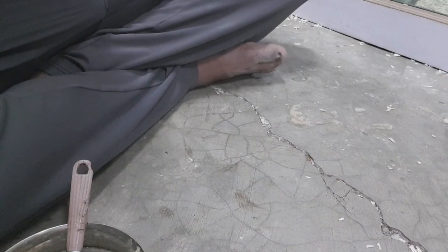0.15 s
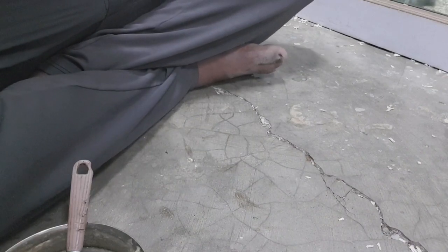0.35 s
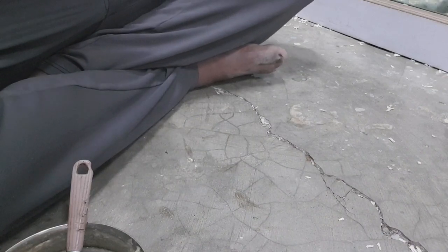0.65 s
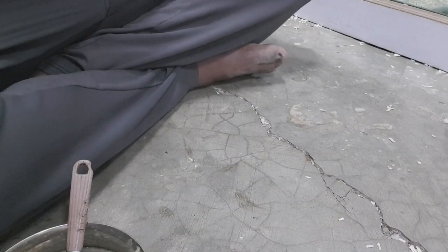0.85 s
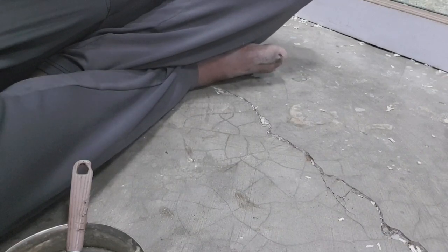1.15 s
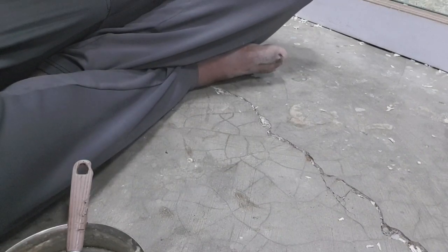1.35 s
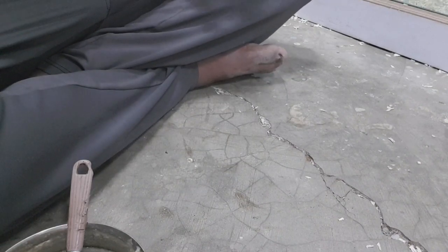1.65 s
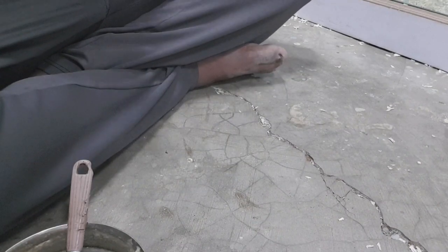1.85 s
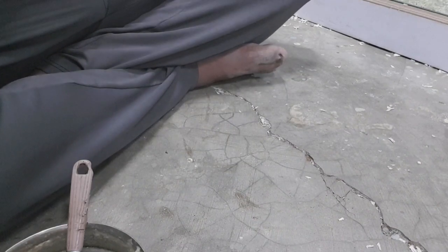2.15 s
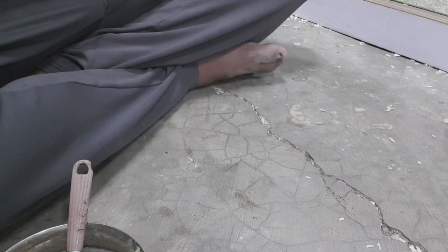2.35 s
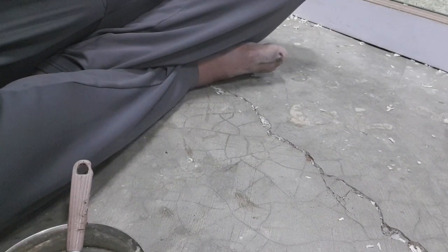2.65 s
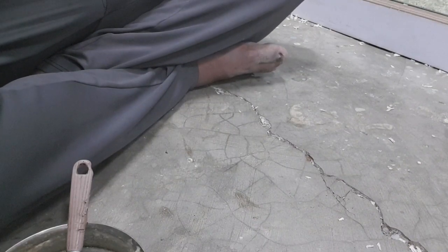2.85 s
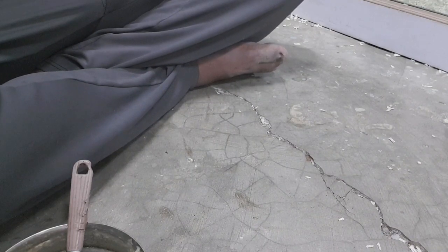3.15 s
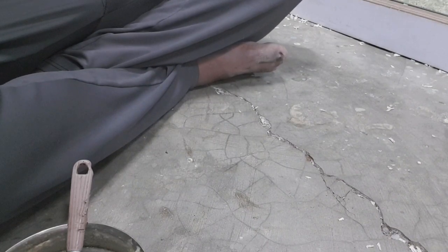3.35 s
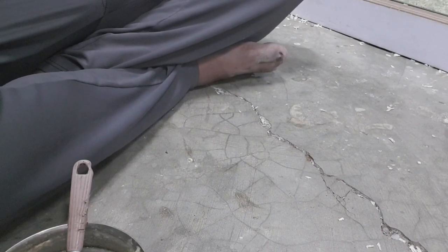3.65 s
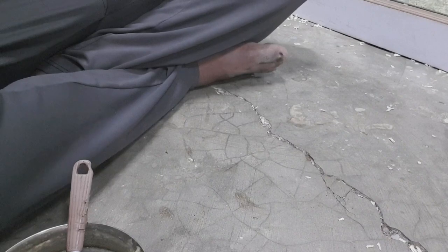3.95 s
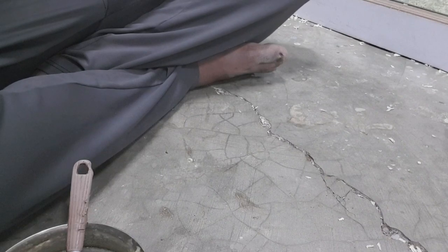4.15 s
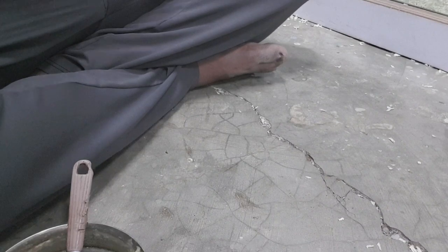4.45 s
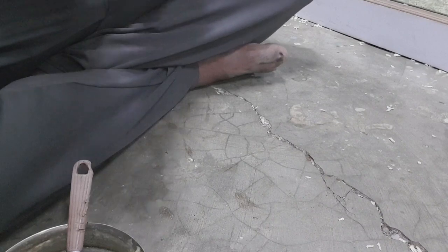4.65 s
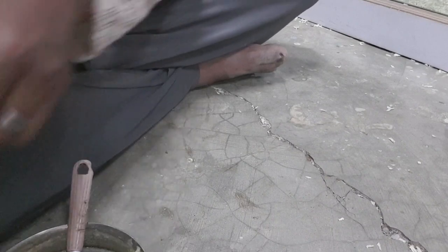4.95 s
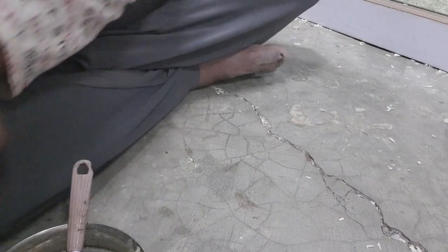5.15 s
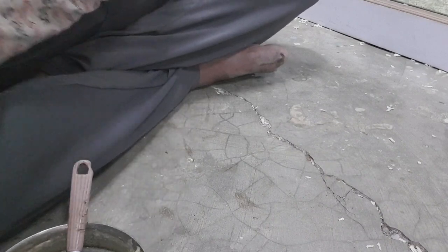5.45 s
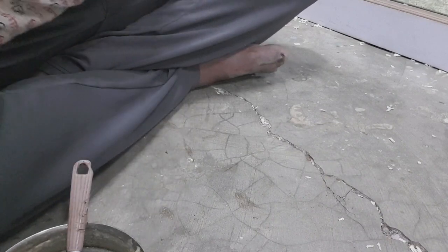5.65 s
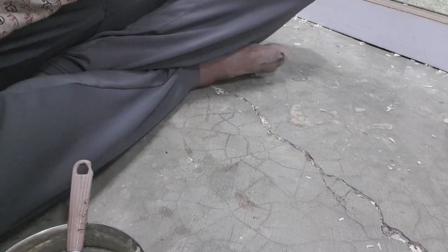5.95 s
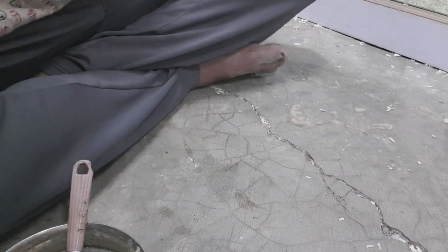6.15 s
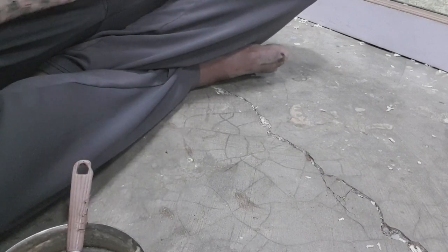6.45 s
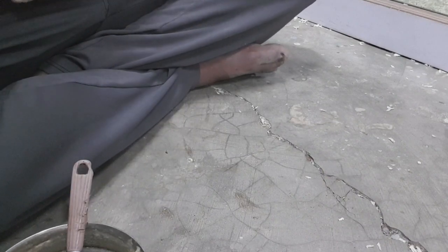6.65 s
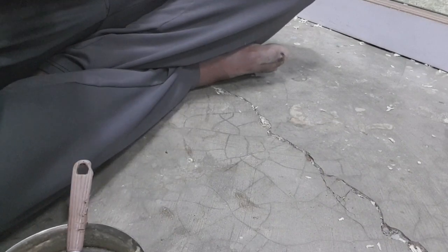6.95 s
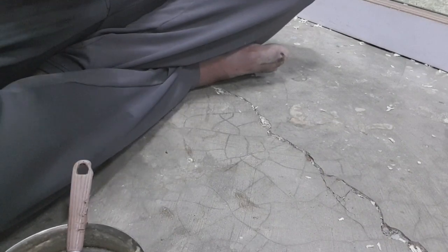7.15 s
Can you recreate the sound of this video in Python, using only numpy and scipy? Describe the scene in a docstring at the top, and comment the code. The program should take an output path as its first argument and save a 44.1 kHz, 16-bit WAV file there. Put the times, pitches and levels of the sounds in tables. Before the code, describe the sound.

In a quiet, hard-floored room, two young parrots squawk in six short, pumping bouts, hoarse and grating, about eight calls a second. In the pauses they whine softly and hiss. A person shifts with a brief cloth rustle at the start and again midway, and small clicks and bumps sound near the microphone. The bouts come closer together in the second half, and the last squawk fades in the room's echo over a faint hum.

```python
"""Two parrot chicks beg for food in a bare, hard-floored room. They open with harsh, pumping squawks
while the feeder shifts on the floor with a rustle of cloth. In each syllable, air drives membranes
in the syrinx: an unsteady tone scoops up to its note, then sags and breaks up into rasp.
Five more bouts follow, among soft whines, hisses, bumps and small clicks; midway the feeder shifts
again. The last squawk dies away in the echo of the walls, over background air and a faint hum."""
import sys
import numpy as np
from scipy import signal
from scipy.fft import rfft, irfft, next_fast_len
from scipy.io import wavfile
from scipy.ndimage import uniform_filter1d, map_coordinates

SR = 44100
rng = np.random.default_rng(int(sys.argv[2]) if len(sys.argv) > 2 else 0)


def master(y):
    """Save y as 16-bit WAV."""
    cut = np.clip(np.atleast_2d(y).T, -1, 1)
    pcm = np.round(cut * 32767)  # scale
    wavfile.write(sys.argv[1], SR, pcm.astype(np.int16))


N = 321930
TIME = np.arange(N) / SR

# Syllables of the lower-voiced chick, about eight a second within a bout. Each row: start in seconds,
# length in seconds, relative level in dB, pitch in Hz, rasp from 0 to 1, brightness in dB,
# tongue resonance in Hz, its lift in dB, nasal lift in dB.
LOW_SQUAWKS = [ (-.03, 0.078, -27, 1100, 0.92, -4, 5330, 3, -14),
               (.128, 0.087, -23, 1190, 0.52, 4.5, 5030, 5, -13),
               (.255, 0.057, -25, 1170, 0.66, 2, 4730, 3, 6),
               (.305, 0.091, -22.5, 1124, 0.49, 3.5, 4460, 14.5, 6),
               (.39, 0.12, -27, 1120, 0.55, 5, 4530, 8, 9), (.52, 0.054, -26, 1093, .68, 5.5, 4500, 4, 14),
               (.615, 0.081, -26, 1082, 0.64, 5, 6460, 4, 6),
               (1.763, .09, -21.5, 1170, 0.54, 5, 4800, 6, 2),
               (1.872, 0.084, -19.5, 1130, 0.81, 3, 4660, 3, 0),
               (1.995, 0.069, -20.5, 1100, 0.69, 3.5, 4540, 3.5, 3.5),
               (2.09, 0.12, -23.5, 1160, 0.52, 2.5, 4750, 1, -17),
               (2.24, 0.057, -20.5, 1060, .78, 6, 4225, 2.5, 0),
               (2.345, 0.088, -27.5, 1069, 0.53, -3, 4080, 17, 1),
               (3.122, .106, -23.5, 1150, .58, 5.5, 4570, 2, 1),
               (3.272, 0.091, -21, 1120, 0.68, 7.5, 4482, 7, 9),
               (3.38, 0.13, -24, 1110, 0.9, 3.5, 4545, 3, 6),
               (4.303, 0.098, -23, 1210, 0.36, 1.5, 5740, 6, -2),
               (4.44, .11, -21, 1120, 0.75, 2.5, 4420, 4.5, 11),
               (4.54, 0.074, -25.5, 1128, 0.4, 3.5, 4450, 7.5, -2),
               (4.642, 0.066, -22, 1125, 0.4, 2.5, 4445, 6, 11.5),
               (4.72, 0.093, -29.5, 1150, 0.69, 1, 5750, 7, -6),
               (4.89, 0.057, -28.5, 1150, 0.79, -0.5, 4800, 0, -8),
               (5.3, 0.103, -24, 1248, 0.23, 2, 6240, 5, 7),
               (5.42, 0.13, -25.5, 1215, .55, 0, 4900, -3.5, -3),
               (5.55, 0.066, -23, 1140, 0.41, 2, 5614, -1, 5.5),
               (5.645, 0.078, -26, 1180, .6, -2, 5610, 2, -11),
               (5.705, 0.058, -20.5, 1177, 0.92, -1, 3900, 7, 0.5),
               (6.379, 0.099, -22, 1245, 0.34, 3.5, 5300, 9, 11.5),
               (6.5, 0.0795, -22, 1190, 0.63, 3, 5212, 2, 2),
               (6.622, .088, -21, 1190, 0.68, 2, 4720, 6, -1),
               (6.772, 0.056, -19.5, 1177, 0.48, 5.5, 4717, 6, 9)]
# Syllables of the higher-voiced chick. Each row: start in seconds, length in seconds,
# relative level in dB, pitch in Hz, rasp from 0 to 1, brightness in dB.
HIGH_CRIES = [ (-.04, 0.158, -34.5, 1596, .55, -0.5), (.47, 0.27, -28, 1605, .68, 2),
              (1.8, 0.1, -28.5, 1419, .55, 8), (2.09, .13, -33, 1555, .6, -4),
              (2.29, .075, -29, 1523, .5, 3.5), (2.37, 0.059, -30, 1625, .5, 12),
              (3.15, .14, -28, 1410, .62, 5.5), (4.38, 0.069, -30.5, 1586, .58, 7.5),
              (4.52, .1, -32, 1511, .55, -2), (4.76, .2, -42.5, 1626, .68, 0),
              (5.12, 0.088, -34, 1455, .52, -1), (5.205, 0.11, -30.5, 1524, .3, 2),
              (5.32, .12, -35.5, 1568, .45, 2), (6.87, .135, -35, 1486, .5, 2.5)]
# Steady response of the throat. Each row: frequency in Hz, gain in dB.
THROAT_RESPONSE = [(300, -46), (520, -50), (700, -10.5), (900, -16.5), (1350, -15), (1900, -8.5),
                   (2650, -10), (3200, -0.5), (4000, -2.5), (5700, 0), (7800, -6), (8900, -10.5),
                   (9800, -16), (12000, -20), (15300, -37.5)]
# Steady resonances of the beak. Each row: centre in Hz, width in Hz, lift in dB.
BEAK_RESONANCES = [(1055, 170, 8), (7400, 210, 1.5), (8100, 400, 1.5), (8730, 830, 2.5), (11100, 690, 2)]
# Low hollow resonance of the throat, set once a bout. Each row: time in seconds, centre in Hz, lift in dB.
HOLLOW_RESONANCE = [(.4, 780, -14), (2.1, 710, -10), (3.3, 990, 9.5), (4.6, 695.8, 7), (5.7, 825, -4.5),
                    (6.6, 1000, 8.5)]
# Soft whines. Each row: start and end in seconds, first, middle and last pitch in Hz,
# relative level in dB, waver as a share of the pitch.
SOFT_WHINES = [(0.833, 0.981, 3100, 3010, 3080, -47.5, .025), (1.172, 1.369, 3770, 3615, 2950, -46, 0.037),
               (2.709, 2.921, 3490, 3670, 3620, -38, .06), (3.043, 3.138, 3480, 3650, 3800, -48.5, 0.053),
               (3.613, 3.761, 2745, 2757, 2805, -44.5, .08), (3.854, 4.171, 3260, 3540, 3790, -41.5, 0.074),
               (4.164, 4.269, 2634, 2687, 2720, -38, 0.021), (4.223, 4.332, 3000, 3110, 3247, -39, 0.038)]
# Faint hisses. Each row: midpoint in seconds, length in seconds, relative level in dB.
FAINT_HISSES = [(1.028, 0.15, -43), (1.188, 0.16, -42), (1.357, 0.14, -42.5), (1.52, 0.2, -48.5),
                (2.617, 0.2, -40.5), (2.771, 0.11, -39.5), (2.96, 0.17, -44.5), (4, 0.071, -51),
                (4.164, 0.11, -45.5), (4.239, 0.11, -51)]
# Small clicks. Each row: start in seconds, peak in dB, centre in Hz, width in Hz, 60 dB decay in seconds.
SMALL_CLICKS = [(1.487, -34, 1490, 2480, 0.013), (1.533, -40, 1206, 2000, 0.019),
                (2.674, -33, 9100, 8970, 0.066), (2.688, -31, 10210, 2490, 0.022),
                (3.649, -34, 12050, 3000, 0.029), (3.922, -12.5, 2320, 1230, 0.0047),
                (3.922, -13.5, 6800, 9100, 0.0011), (3.937, -30, 6000, 7974, .04),
                (6.048, -38, 8980, 7000, 0.0064), (6.133, -35, 6800, 1990, 0.013),
                (6.285, -37, 5000, 5070, 0.0076), (6.362, -34, 10720, 1804, 0.014),
                (7.149, -45, 10500, 2493, 0.02), (7.197, -34, 10450, 2600, 0.012),
                (7.218, -41, 10500, 2520, 0.01)]
# Soft bumps. Each row: start in seconds, peak in dB, pitch in Hz, 60 dB decay in seconds.
SOFT_BUMPS = [(.68, -39, 54.7, 0.18), (.82, -38, 95, .08), (1.445, -43, 150, .04), (1.484, -27, 160, 0.012),
              (1.532, -30.5, 132, 0.024), (2.17, -34, 159.8, 0.05), (2.239, -30.5, 150, 0.055),
              (2.675, -35, 59, 0.22), (2.68, -34, 182, 0.054), (3.649, -38, 119, 0.085),
              (3.738, -32, 143, 0.059), (3.923, -22, 95, 0.031), (3.936, -42, 81, .12),
              (3.948, -34, 169, 0.055), (6.48, -37, 435, 0.094)]
# The feeder's movements. Each row: start and length in seconds, relative rub and rustle levels in dB.
FEEDER_SHIFTS = [(-.05, 0.17, -48.5, -42.5), (0.083, 0.2, -50, -38), (0.25, 0.27, -52.5, -68),
                 (3.589, 0.12, -43, -52), (3.735, 0.15, -41, -50), (3.878, 0.08, -43, -47)]
# Spectra of the cloth's low rub, its rustle and the room's air. Each row: frequency in Hz, gain in dB.
RUB_SPECTRUM = [(30, -2), (90, 6), (170, 2), (300, -3), (800, -13.5), (3000, -60)]
RUSTLE_SPECTRUM = [(100, -46), (320, -2), (800, -9), (2000, -9), (7000, -8), (13000, -13), (16000, -54)]
AIR_SPECTRUM = [(20, -34), (30, -12), (42, 2.5), (55, -3.5), (80, 5), (98, -7.5), (125, 2), (224, -4.5),
                (394, -6.5), (515, -4.5), (729, -11), (1390, -12.5), (2300, -19), (4040, -28),
                (8780, -25.5), (15000, -44)]
# Reverberation of the room. Each row: frequency in Hz, 60 dB decay in seconds.
REVERB_TIMES = [(300, 0.48), (2000, 0.91), (5000, 0.6), (9000, 0.67), (15000, 0.37)]
# Slow rise of the background. Each row: time in seconds, relative level in dB.
BACKGROUND_LEVEL = [(0, -57.5), (1.5, -56), (2.2, -54), (3.3, -51.5), (7.3, -52)]
# Partials of the hum. Each row: frequency in Hz, greatest level in dB.
HUM_PARTIALS = [(79.6, -57.5), (119, -57.5), (350, -62), (447, -75), (521, -58.5)]

ATTACK_S, RELEASE_S, SWELL_DB = 0.026, 0.027, 4  # a syllable opens, swells to its middle and dies away
SCOOP_SHARE, SCOOP_S = .06, .012  # the pitch starts low and rises with this time constant
SAG_PER_S, RASP_PER_S = 0.1994, 1.16  # it sinks as the air runs out, and the voice grows hoarser
GAPE_DB = 4.5  # brightness lost while the beak is nearly shut


def squawks(rattle_db=0.9, flutter_db=-1.5):
    """Source and filter: each chick's syrinx excites the throat, and a wider gape brightens the voice."""
    low_gain, low_hz, low_rasp, low_bright_db, tongue_hz, tongue_db, nasal_db = syllables(LOW_SQUAWKS)
    high_gain, high_hz, high_rasp, high_bright_db = syllables(HIGH_CRIES)
    effort = np.hypot(low_gain, high_gain)
    high_share = (high_gain / (effort + 1e-12)) ** 2  # part of the total power
    low_share = 1 - high_share
    low = syrinx(low_hz, low_rasp, jitter=0.0203, waver=.019, fundamental_db=-3.0)
    high = syrinx(high_hz, high_rasp, jitter=0.027, waver=.022, fundamental_db=7)
    # the membranes slap irregularly, which makes the voice harsh
    rattle = unit(amp(rattle_db * wobble(420) + flutter_db * wobble(60)))
    source = (np.sqrt(low_share) * low + np.sqrt(high_share) * high) * rattle
    voice = throat(source, tongue_hz, tongue_db * low_share, nasal_db * low_share)
    # the partials share one stream of air, so their joint power is held level before effort scales it
    voice = voice / np.sqrt(np.abs(uniform_filter1d(voice ** 2, size=1400)) + 1e-12)
    body = filtered(voice, lambda hz: 1 / (1 + (hz / 3600) ** 6))
    edge = filtered(voice, lambda hz: 1 - 1 / (1 + (hz / 6800) ** 6))
    gape = amp(low_share * low_bright_db + high_share * high_bright_db)
    return effort * (voice + body * (1 / gape - 1) + edge * (gape - 1))


def syllables(table):
    """Modulation by breath and beak: one chick's loudness, pitch, rasp, brightness and any resonances."""
    loudness, opening, flatness, hoarser = np.zeros((4, N))
    t = np.arange(SR // 2) / SR
    for start, length, db, *_ in table:
        swell = amp(-SWELL_DB * (2 * np.minimum(t / length, 1) - 1) ** 2)
        envelope = np.minimum(t / ATTACK_S, 1) * swell * np.exp(-np.maximum(t - length, 0) / RELEASE_S)
        from_middle_s = (t - length / 2) * (t < length)
        add(loudness, start, amp(db) * envelope)
        add(opening, start, envelope)
        add(flatness, start, SCOOP_SHARE * np.exp(-t / SCOOP_S) + SAG_PER_S * from_middle_s)
        add(hoarser, start, RASP_PER_S * from_middle_s)
    # settings hold through most of a syllable, then glide to the next
    held = [(start + part * length, *rest) for start, length, db, *rest in table for part in (.15, .9)]
    pitch, rasp, bright_db, *resonances = curves(held)
    closing_db = GAPE_DB * (np.minimum(opening, 1) - 1)
    return loudness, pitch * (1 - flatness), rasp + hoarser, bright_db + closing_db, *resonances


def syrinx(pitch, rasp, jitter, waver, fundamental_db, break_db=3.5, doubling=0.37, harmonics=10):
    """Flow-driven oscillation: flapping membranes give unsteady harmonics and a hiss once a cycle."""
    rasp = np.clip(rasp, .02, .98)
    unsteady = 1 + rasp * (jitter * wobble(900) + waver * wobble(110))
    phase = 2 * np.pi * np.cumsum(pitch * unsteady) / SR
    tone = amp(fundamental_db) * np.cos(phase)
    for k in range(2, harmonics + 1):
        overtone = np.cos(k * phase + rng.uniform(0, 2 * np.pi))
        breaking = unit(amp(break_db * wobble(55)))  # each overtone swells and breaks off on its own
        tone += overtone * breaking / np.sqrt(1 + (k / 7) ** 6)
    tone *= 0.92 / np.sqrt(harmonics)
    # period doubling: alternate strong and weak cycles put hoarse lines halfway between the harmonics
    tone *= 1 + doubling * wobble(30) * np.cos(phase / 2)
    hiss = unit(rng.standard_normal(N) * (1 + 0.27 * np.cos(phase)))
    return np.sqrt(1 - rasp) * tone + np.sqrt(rasp) * hiss


def throat(source, tongue_hz, tongue_db, nasal_db, restless_db=3.0):
    """Resonance: throat and beak shape the voice with steady peaks, three that vary, and random ripple."""
    hz, t, spectrum = signal.stft(source, SR, nperseg=512)
    hz = hz[:, None]
    peak = lambda centre_hz, width_hz: 1 / (1 + (2 * (hz - centre_hz) / width_hz) ** 2)
    tongue_hz, tongue_db, nasal_db = [np.interp(t, TIME, c) for c in (tongue_hz, tongue_db, nasal_db)]
    hollow_hz, hollow_db = curves(HOLLOW_RESONANCE, t)
    beak_db = sum(db * peak(centre, width) for centre, width, db in BEAK_RESONANCES)
    moving_db = (tongue_db * peak(tongue_hz, width_hz=800)
                 + nasal_db * peak(2220, width_hz=320)
                 + hollow_db * peak(hollow_hz, width_hz=220))
    ripple = uniform_filter1d(rng.standard_normal(spectrum.shape), size=4, axis=0)
    ripple = unit(uniform_filter1d(ripple, size=6, axis=1))
    gain_db = along(THROAT_RESPONSE, hz) + beak_db + moving_db + restless_db * ripple
    return signal.istft(spectrum * amp(gain_db), SR, nperseg=512)[1][:N]


def whines(overtone_db=-15, flutter_db=2.6):
    """Frequency modulation: a thin tone and its octave glide and quiver between the bouts."""
    out, quiver = np.zeros(N), wobble(1100)
    for start, end, first, middle, last, db, waver in SOFT_WHINES:
        pitch = np.interp(TIME, [start, (start + end) / 2, end], [first, middle, last])
        phase = 2 * np.pi * np.cumsum(pitch * (1 + waver * quiver)) / SR
        out += amp(db) * arch(start, end) * (np.sin(phase) + amp(overtone_db) * np.sin(2 * phase))
    return out * amp(flutter_db * wobble(200))


def hisses(gain_db=-1):
    """Broadband noise: the chicks hiss in short puffs, strongest near 6 kHz."""
    puffs = sum(amp(db + gain_db) * arch(middle - length / 2, middle + length / 2)
                for middle, length, db in FAINT_HISSES)
    return puffs * noise([(800, -16), (2000, -2.5), (3500, 0.0), (4600, 3.0), (6200, 4.5),
                          (9000, -3), (12000, -17.5), (15000, -36)])


def knocks():
    """Damped vibration: small things click as decaying bands of noise and bump as decaying low tones."""
    out, t = np.zeros(N), np.arange(SR // 4) / SR
    for start, db, hz, width, t60 in SMALL_CLICKS:
        edges_hz = np.clip([hz - width / 2, hz + width / 2], 100, SR / 2 - 100)
        band = signal.butter(3, edges_hz, btype="band", fs=SR)
        tick = signal.lfilter(*band, rng.standard_normal(len(t)) * amp(-60 * t / t60))
        add(out, start, amp(db) * tick / np.abs(tick).max())
    for start, db, hz, t60 in SOFT_BUMPS:
        add(out, start, amp(db - 60 * t / t60) * np.sin(2 * np.pi * hz * t))
    return out


def cloth():
    """Friction: cloth gives an uneven low rub and a bright rustle as the feeder moves."""
    rub = amp(5.1 * wobble(43)) * noise(RUB_SPECTRUM)
    rustle = amp(1.6 * wobble(81)) * noise(RUSTLE_SPECTRUM)
    return sum(arch(start, start + length) * (amp(rub_db) * rub + amp(rustle_db) * rustle)
               for start, length, rub_db, rustle_db in FEEDER_SHIFTS)


def room_echo(x, gap_s=.004):
    """Reverberation: reflections from bare walls decay exponentially, slowest in the middle range."""
    hz, t, spectrum = signal.stft(rng.standard_normal(SR), SR, nperseg=256)
    decay = amp(-60 * t / along(REVERB_TIMES, hz)[:, None])
    tail = signal.istft(spectrum * decay, SR, nperseg=256)[1]
    tail = np.pad(tail, (int(gap_s * SR), 0))
    return signal.fftconvolve(x, tail / np.linalg.norm(tail))[:N]


def room_tone(air_db=5, drift_rad=0.35):
    """Ambient noise: background air and a faint hum of wavering phase slowly rise together."""
    level_db, = curves(BACKGROUND_LEVEL)
    hum = sum(amp(db) * np.sin(2 * np.pi * hz * TIME + drift_rad * wobble(5)) for hz, db in HUM_PARTIALS)
    return amp(level_db + air_db) * noise(AIR_SPECTRUM) + amp(level_db - level_db.max()) * hum


def amp(db):
    """Decibels as an amplitude ratio."""
    return 10 ** (np.asarray(db) / 20)


def unit(x):
    """Normalisation to rms 1."""
    return x / np.sqrt(np.mean(x ** 2) + 1e-20)


def along(points, hz):
    """Interpolation of (Hz, value) points on a logarithmic frequency axis."""
    point_hz, values = np.transpose(points)
    return np.interp(np.log(hz + 1), np.log(point_hz + 1), values)


def curves(rows, times=TIME):
    """Linear interpolation in time of each column after the first."""
    row_times, *columns = np.transpose(rows)
    return [np.interp(times, row_times, column) for column in columns]


def wobble(rate):
    """Random modulation: a smooth curve with rate knots a second."""
    knots = rng.standard_normal(N // 16)[:int(N * rate / SR) + 4]
    coarse = TIME[::8]
    return np.interp(TIME, coarse, map_coordinates(knots, [coarse * rate], mode="nearest"))


def filtered(x, response):
    """Linear filtering: the spectrum of x times a function of frequency."""
    size = next_fast_len(N + 8192)
    return irfft(rfft(x, size) * response(np.fft.rfftfreq(size, 1 / SR)), size)[:N]


def noise(spectrum):
    """Coloured noise of rms 1, shaped by (Hz, dB) points."""
    return unit(filtered(rng.standard_normal(N), lambda hz: amp(along(spectrum, hz))))


def arch(start, end):
    """A rounded envelope between two times."""
    return np.sqrt(np.abs(np.sin(np.pi * np.clip((TIME - start) / (end - start), 0, 1))))


def add(track, start_s, x):
    """Superposition of x on the track from the given time."""
    first = round(start_s * SR)
    x = x[max(-first, 0):]
    part = track[max(first, 0):][:len(x)]
    part += x[:len(part)]


def scene(direct_db=-3.0, echo_db=-5.5, near_echo_db=-16):
    """Direct and reverberant sound: the chicks fill the room; knocks and cloth are close, nearly dry."""
    chicks = squawks() + whines() + hisses()
    near = knocks() + cloth()
    echo = room_echo(amp(echo_db) * chicks + amp(near_echo_db) * near)
    return (amp(direct_db) * chicks + near + echo + room_tone())[None]


def record(dry, top_hz=15450):
    """Band limiting: nothing above the top frequency passes."""
    return filtered(dry[0], lambda hz: hz < top_hz)[None]


dry = scene()
out = record(dry)
master(out)
```